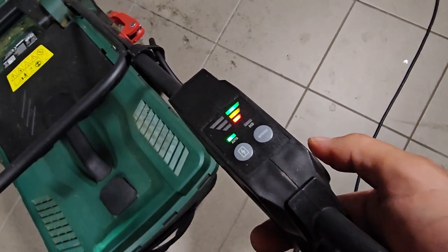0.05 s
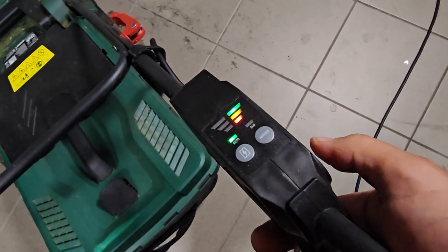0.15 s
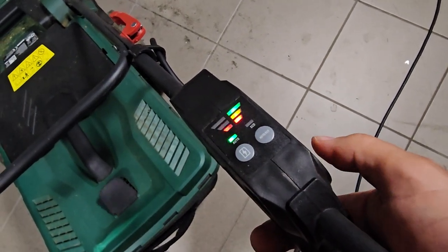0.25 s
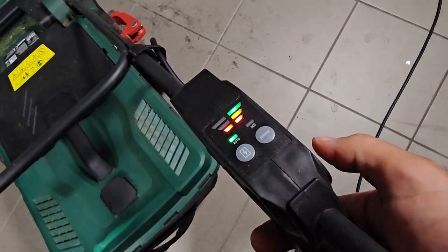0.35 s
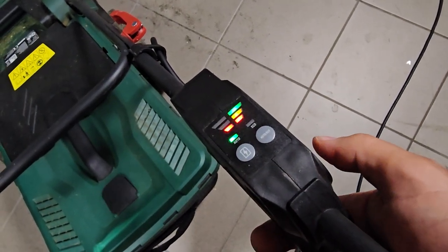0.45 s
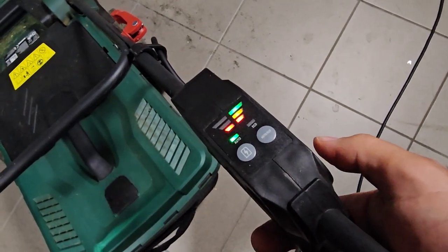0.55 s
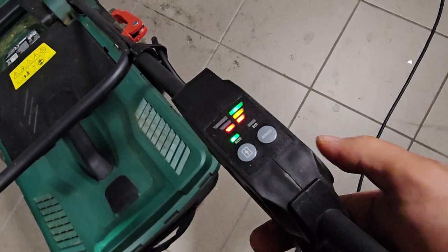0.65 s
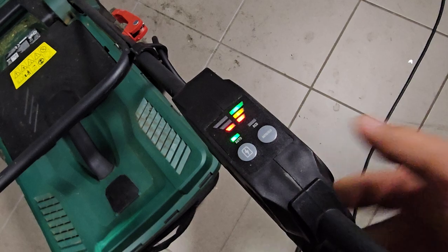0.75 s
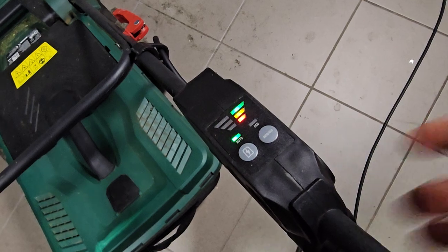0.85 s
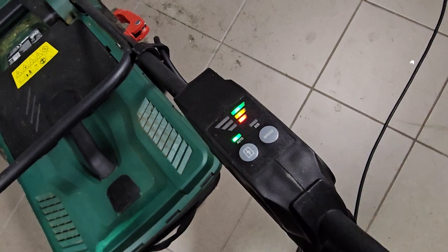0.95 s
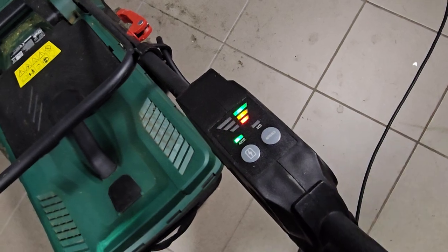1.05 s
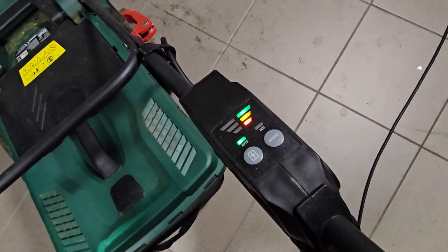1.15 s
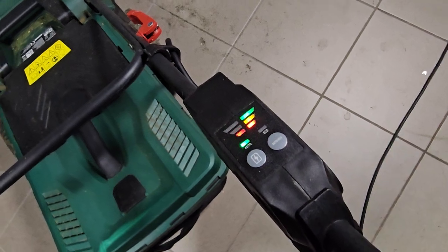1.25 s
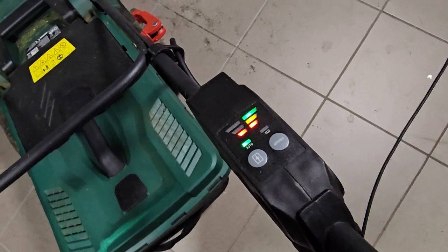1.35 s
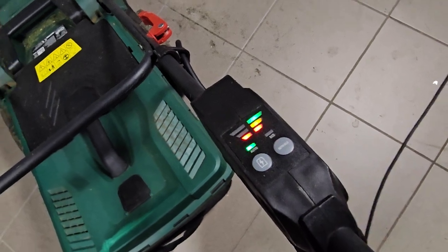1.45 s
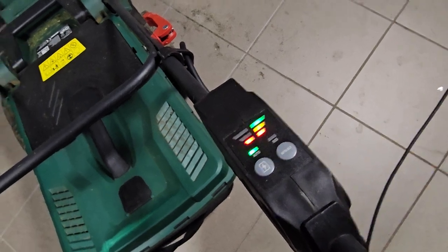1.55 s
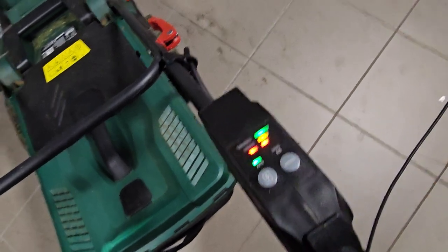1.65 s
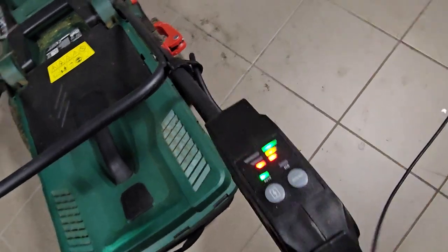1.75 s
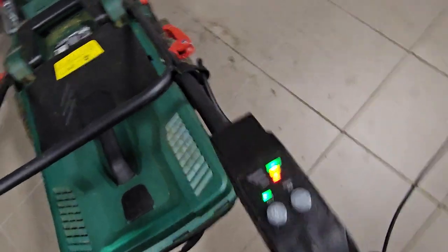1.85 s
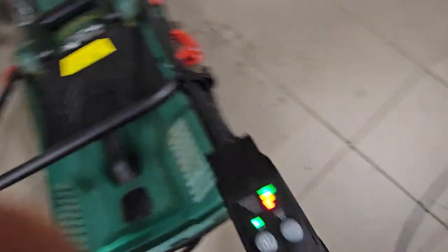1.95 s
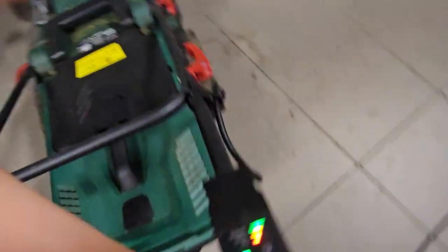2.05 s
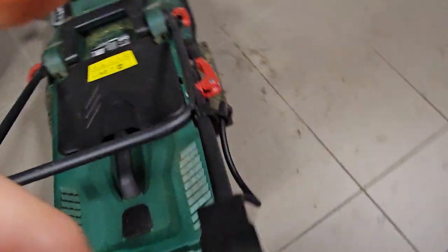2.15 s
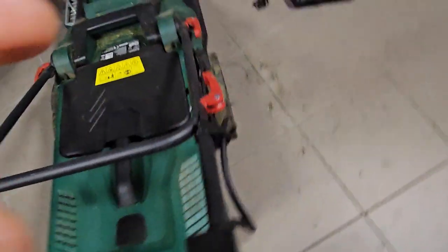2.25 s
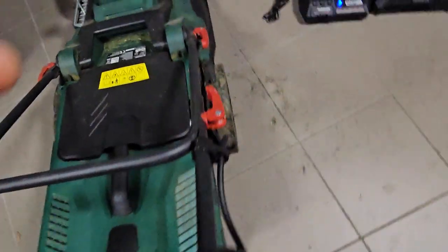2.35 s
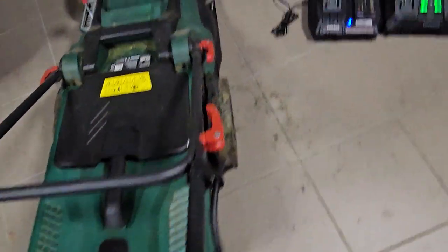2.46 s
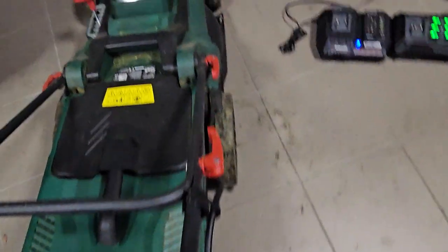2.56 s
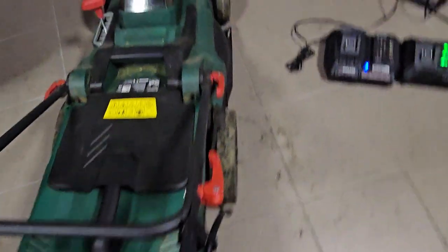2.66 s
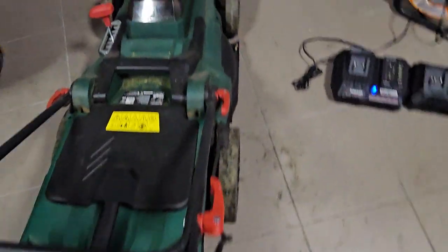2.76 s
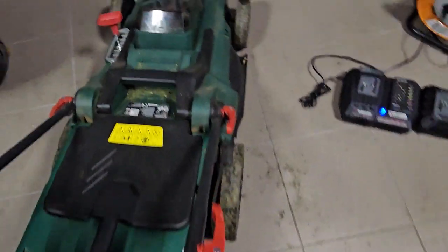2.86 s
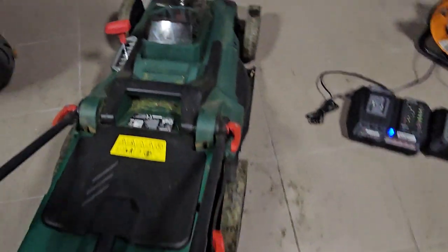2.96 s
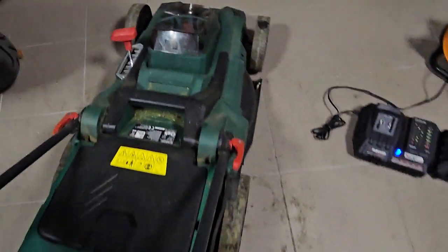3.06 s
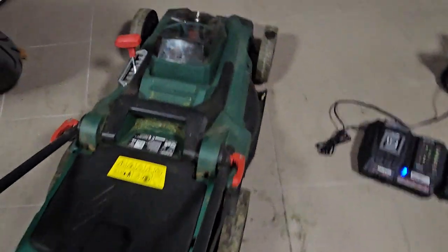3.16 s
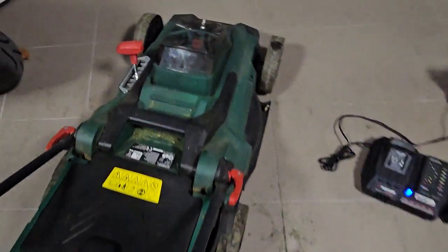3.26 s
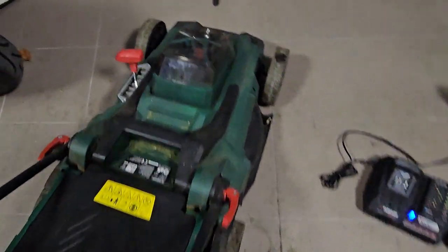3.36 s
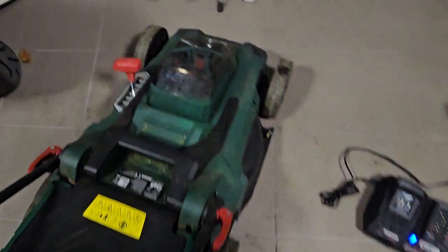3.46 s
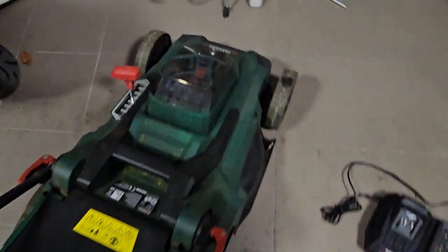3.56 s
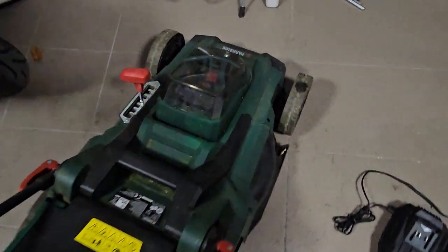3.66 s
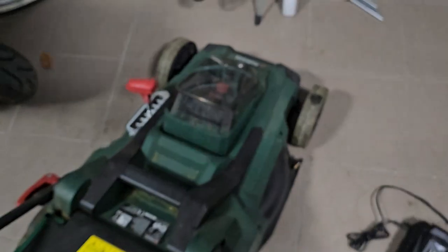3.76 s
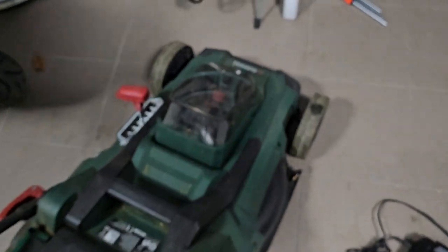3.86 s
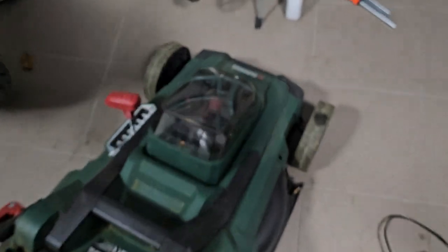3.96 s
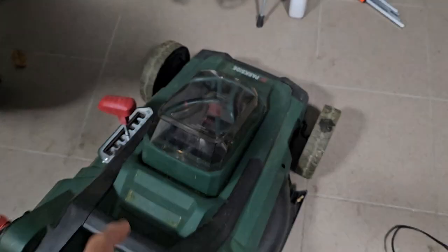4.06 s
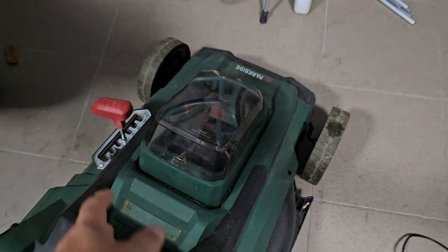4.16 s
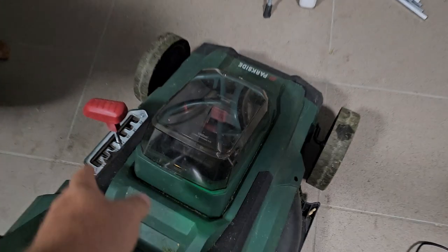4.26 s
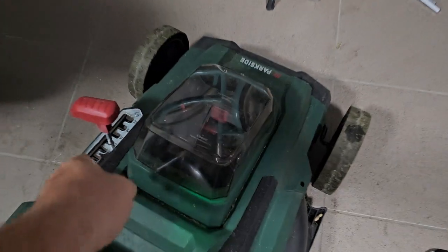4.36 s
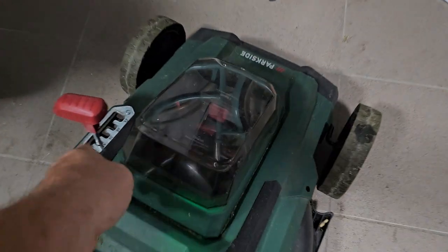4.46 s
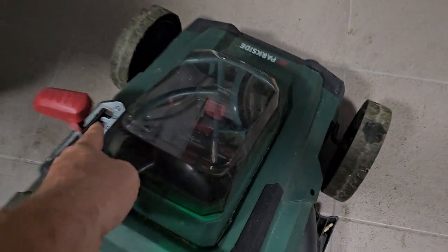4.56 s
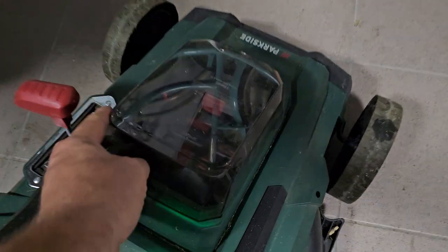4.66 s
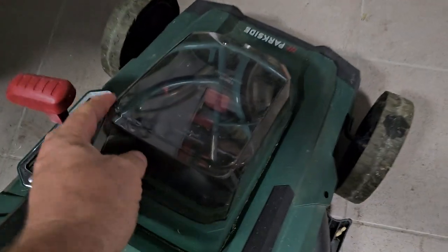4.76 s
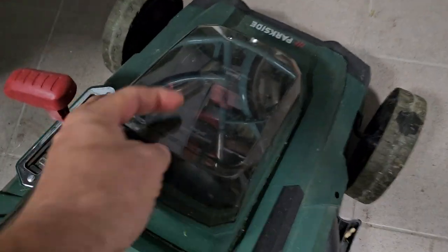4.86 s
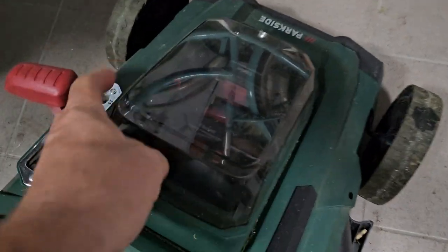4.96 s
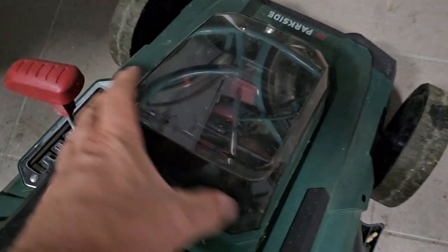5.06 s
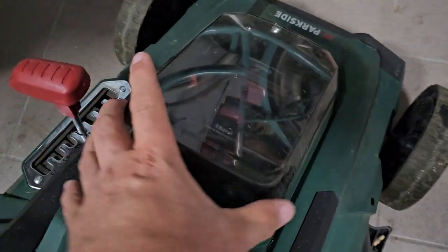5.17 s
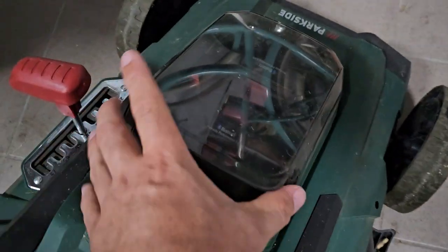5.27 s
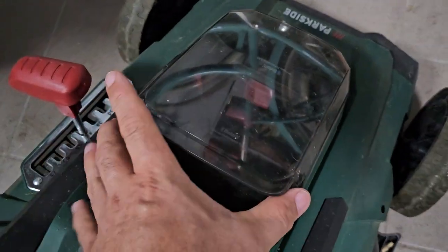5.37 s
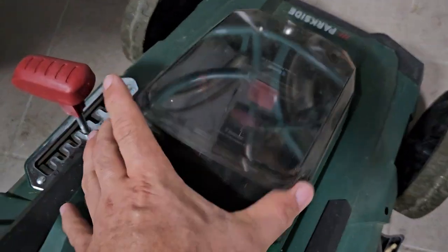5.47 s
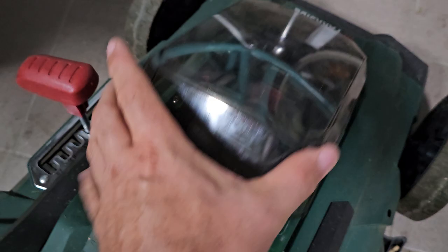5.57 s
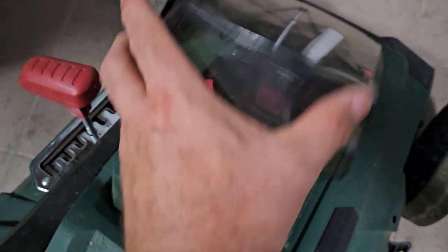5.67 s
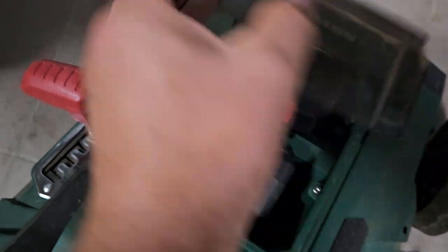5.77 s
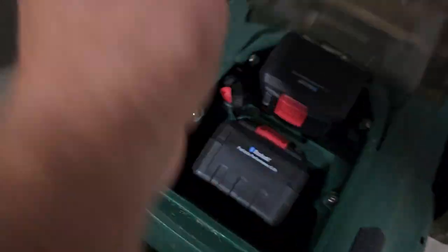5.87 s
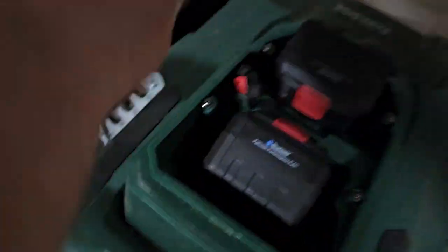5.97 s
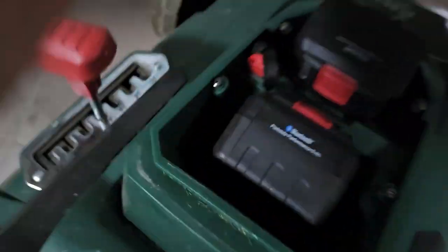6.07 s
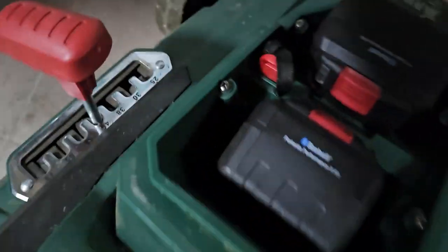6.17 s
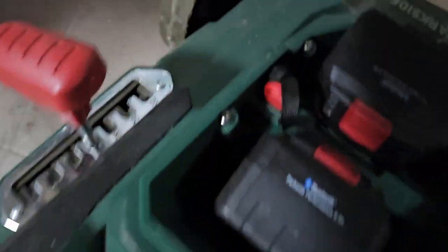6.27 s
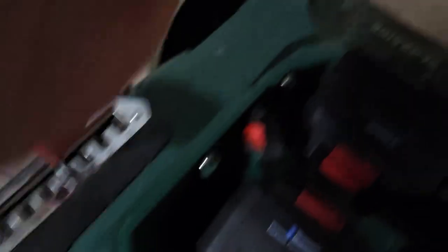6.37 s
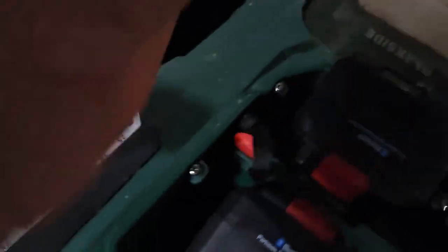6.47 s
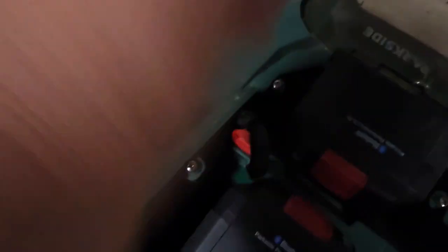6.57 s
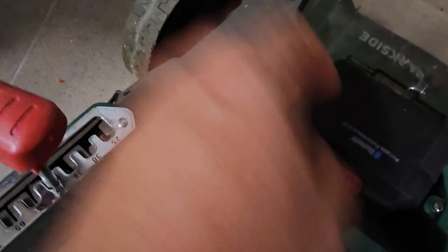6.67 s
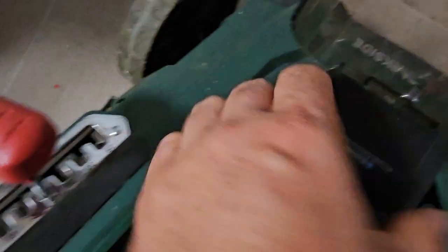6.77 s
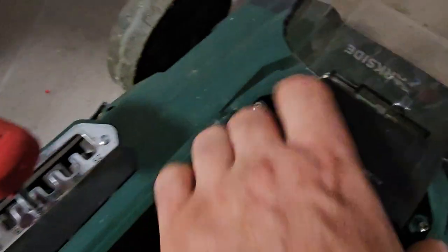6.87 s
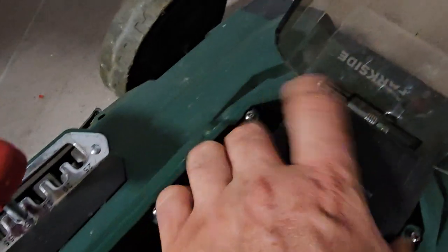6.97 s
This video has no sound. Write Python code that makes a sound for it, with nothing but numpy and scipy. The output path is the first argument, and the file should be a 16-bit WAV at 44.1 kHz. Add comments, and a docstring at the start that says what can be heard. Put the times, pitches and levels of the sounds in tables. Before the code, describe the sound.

Heard close up in a quiet garage, an electric mower hums and whooshes, then winds down with sinking whines and a metallic knock. A spring lever clicks and creaks before slamming back with a brief rattle and ring. Faint cloth swishes and footstep scuffs follow. Near the end a hand bumps and drags over a plastic cover, flips it open with a clatter, and a battery knocks lightly in its slot.

```python
"""A cordless lawnmower runs down in a tiled garage: its spinning blade whirrs through the air, the
motor brakes with falling whines, and the blade rocks to rest with a few knocks.
The switch lever clicks, creaks on its spring and snaps back against the ringing steel handle.
Clothes rustle as someone leans over, lifts the plastic battery lid and grips a battery."""
import sys
import numpy as np
from scipy import signal
from scipy.fft import rfft, irfft, next_fast_len
from scipy.io import wavfile

SR = 44100
rng = np.random.default_rng(int(sys.argv[2]) if len(sys.argv) > 2 else 0)


def inscribe(sig):
    """Save sig as 16-bit PCM at rate SR to the path in sys.argv[1].

    A 1-D sig is mono; a 2-D sig holds one channel per row.
    Samples are clipped to [-1, 1] before scaling.
    """
    pcm = np.round(np.clip(np.atleast_2d(sig).T, -1, 1) * 32767)
    wavfile.write(sys.argv[1], SR, pcm.astype(np.int16))


N = 310023
TIME = np.arange(N) / SR

# Levels in the tables are relative: each function sets the overall loudness of its sound.
# how long the garage echoes: (pitch [Hz], time to fade by 60 dB [s])
ECHO_TIMES = [(100, 0.99), (400, 0.34), (2000, 0.43), (6000, 0.44), (15000, 0.32)]
# how alike left and right are: (pitch [Hz], likeness [1 = the same, 0 = unrelated])
STEREO_LIKENESS = [(80, 0.9), (260, 0.92), (520, 0.88), (1000, 0.16), (2500, -0.062), (12000, -0.0058)]

# the tone colour of the echo and of each noise: (pitch [Hz], level [dB])
ECHO_COLOUR = [(80, -9.5), (300, -6), (1000, 3), (4000, 2.5), (15000, 0.5)]
BACKGROUND_COLOUR = [(12, -34), (20, 4), (55, 2), (167, -14), (255, -6.5), (387, -27.5), (542, -17),
                     (922, -31.5), (1660, -24), (3840, -41.5), (7510, -40.5), (9130, -44), (16000, -33)]
CLOTH_COLOUR = [(180, -2), (300, 2.5), (405, -15), (502, -5.5), (667, -6.5), (1010, -9.5), (1170, -2),
                (1840, 0.5), (4510, -6.5), (7310, -7), (10700, -10), (14900, -9.5), (16000, -14)]
HAND_DRAG_COLOUR = [(41, -14), (70, 0), (87, -13), (118, 1.5), (250, 3), (474, -34), (545, -7.5),
                    (593, -19), (900, -21), (1170, -58), (1980, -120)]
WIRE_CHATTER_COLOUR = [(59, -41.5), (100, -12.5), (177, -16), (308, 4.5), (406, -13), (546, -7),
                       (801, -15.5), (1280, -9), (1700, -7.5), (1950, -1.5), (2800, -15), (4280, -9.5),
                       (5300, -15), (15000, -21.5), (16000, -32)]
BRAKE_RASP_COLOUR = [(500, -43), (1100, -10), (1320, 1), (1700, -14.5), (2150, -8), (2350, 2.5),
                     (2600, -15.5), (3100, -21.5), (8000, -50.5)]
BLADE_AIR_COLOUR = [(59, -28), (100, -17), (119, -6.5), (193, -10.5), (234, 3), (289, -6), (321, 0.5),
                    (397, -13.5), (513, -2.5), (735, -10.5), (784, -13), (2040, -14.5), (3320, -20.5),
                    (4760, -21), (16000, -40.5)]

# things that knock: (time [s], bass [dB], middle [dB], treble [dB], fade time [s])
SMALL_TICKS = [(1.831, -60, -50.5, -54, 0.0022), (1.915, -62, -69, -53.5, 0.0015),
               (1.95, -48.5, -67, -47, 0.0033), (1.972, -56, -44.5, -47, 0.0012),
               (2.023, -48, -49.5, -51, 0.002), (2.246, -63, -48, -73, 0.00044),
               (2.858, -80, -46.5, -101.5, .002), (2.912, -86.5, -44.5, -99, 0.0018),
               (3.345, -91.5, -54.5, -70, 0.0024), (3.367, -97, -60, -54.5, 0.0018),
               (3.526, -56.5, -47, -59, 0.006), (4.053, -68, -51, -69, 0.0045),
               (4.211, -87.5, -41.5, -48, 0.0016)]  # a hand's grip, and grit under shoes
LID_HITS = [(4.779, -46.5, -53.5, -58.5, 0.0064), (4.882, -56, -49.5, -46.5, 0.0075),
            (4.897, -35.5, -68, -69, 0.0028), (4.914, -29, -44, -61, 0.0036), (4.96, -70, -41, -43, 0.0035),
            (5.056, -48, -63, -47.5, 0.0054), (5.125, -44.5, -81, -52, 0.0042),
            (5.558, -36, -48, -52, 0.023), (5.573, -26, -35.5, -42.5, 0.0052),
            (5.586, -26, -26.5, -49, 0.0069), (5.593, -23.5, -41, -55, 0.0028),
            (5.612, -28.5, -49, -58, 0.0029), (5.66, -40, -47.5, -58.5, 0.013),
            (5.772, -56, -49, -62, 0.012), (5.796, -42.5, -53, -57.5, 0.036), (6.07, -49, -47, -48, 0.015)]  # fingers and lid hit the housing
BATTERY_HITS = [(6.422, -48.5, -45, -43.5, 0.0022), (6.467, -50.5, -50.5, -49.5, 0.0084),
                (6.565, -44.5, -53.5, -59, 0.01), (6.594, -50, -35, -44.5, 0.0064),
                (6.604, -49, -55, -45.5, 0.0057), (6.777, -54, -59, -61, 0.0085),
                (6.797, -51.5, -45.5, -59.5, 0.029), (6.83, -48.5, -65, -58, 0.011),
                (6.984, -52.5, -52.5, -50.5, 0.004)]  # the battery shifts in its slot
LEVER_HITS = [(2.1037, -54, -31, -28, .001), (2.1087, -54, -31, -30, .0016),
              (2.4405, -35, -20.5, -22, .0014)]  # the lever unlatches, then slams home
BLADE_HITS = [(.524, -16, -21, -25, 0.0096), (.541, -18.5, -39, -23.5, 0.0025),
              (1.033, -36.5, -39, -39.5, 0.0061), (1.078, -33.5, -42, -55, 0.0015),
              (1.12, -40.5, -47, -57, 0.0018), (1.192, -41, -58, -80, 0.003),
              (1.251, -46, -50.5, -62, 0.0029), (1.367, -52, -88, -90, .003),
              (1.418, -52.5, -56.5, -79, 0.002)]  # the brake jolts the slack drive, then the blade rocks

# the notes a struck part rings with: (pitch [Hz], level [dB], time to fade by 60 dB [s])
LID_NOTES = [(187, -1, 0.099), (259, -1, 0.22), (376, -31, .07), (456.5, 6.5, 0.19), (1095, -3, 0.27),
             (1262, -5, 0.19), (1366, 8.5, .17), (1900, 9, 0.12), (3200, 5, 0.35)]
BATTERY_NOTES = [(208.5, 0.5, 0.16), (330, -13, 0.22), (443, 3, 0.17), (890, 2.5, 0.077), (1340, -11, 0.17),
                 (1517, 7.5, 0.15), (2050, 6.5, 0.058), (3180, 0.5, 0.18), (4350, -9, 0.14)]
SPRING_NOTES = [(3090, -7.5, 0.012), (4570, -1.5, .003), (7700, -1.5, 0.0078), (8300, -21, .004)]
LATCH_NOTES = [(3627, -9.5, 0.01), (4020, 8, 0.0078)]
HANDLE_NOTES = [(280, -13.5, 2.44), (342, -17.5, 0.8), (1920, -15.5, .45), (2300, -13, .2),
                (2740, -28, 0.37), (4662, -7.5, .28), (4926, -19, .2)]
BLADE_NOTES = [(140, -4, 0.24), (252, 9.5, 0.1), (502, 7, 0.12), (539, 8, 0.17), (734.6, 0.5, .07),
               (3600, -7, .3), (3400, -0.5, 0.28), (3795, 0.5, 0.27), (3670, 3, 0.27), (4788, -2, .5)]  # the steel blade and the deck, the plastic shell around it

# strokes of cloth or of a sole: (peak time [s], length [s], scuff level [dB], swish level [dB])
CLOTH_STROKES = [(1.77, 0.34, -57, -55.5), (1.972, 0.24, -50, -68), (2.18, 0.71, -60.5, -53),
                 (2.78, 0.3, -54.5, -58.5), (2.98, 0.22, -61.5, -73), (3.457, 0.31, -73, -65),
                 (3.548, 0.12, -47, -58.5), (3.625, 0.17, -62, -52.5), (4.068, 0.1, -52.5, -50.5),
                 (4.212, 0.31, -48.5, -56), (4.349, 0.12, -50, -41.5), (4.474, 0.15, -45.5, -48),
                 (4.639, 0.14, -56, -55), (4.921, 0.36, -52, -54), (5.098, 0.12, -45, -47.5),
                 (5.433, 1, -66.5, -68.5), (5.921, 0.21, -61, -62), (6.062, 0.3, -56.5, -58.5),
                 (6.214, .2, -63.5, -59.5), (6.826, 0.15, -67, -72), (6.946, .13, -62, -65.5)]
# soft bumps of a palm and its grip: (time [s], level [dB], pitch [Hz], fade time [s])
HAND_THUDS = [(1.604, -53, 60.1, 0.026), (1.666, -45, 64, 0.011), (1.953, -45, 97, 0.024),
              (2.02, -40, 96, 0.0077), (4.455, -46, 109.5, 0.015), (4.698, -44, 150.4, 0.032),
              (4.943, -23, 182, 0.0055), (6.161, -50.5, 48, .04), (6.419, -27, 97.3, 0.0048)]
# the hand drags on the hollow lid: (peak time [s], length [s], level [dB])
HAND_DRAGS = [(4.475, 0.23, -65), (4.919, 0.37, -35.5), (5.144, 0.55, -52), (5.47, 0.89, -52.5)]
# the lever's spring sticks and slips: (time [s], rate [slips per second])
SPRING_SLIPS = [(2.225, 160), (2.244, 147), (2.29, 83), (2.32, 114), (2.359, 220), (2.427, 93)]

# the blade's shaft slows down: (time [s], speed [turns per second])
SHAFT_SPEED = [(0, 91), (.15, 89.8), (.33, 80.2), (.48, 72.8), (.58, 69.5), (.62, 64.5), (.68, 54.4),
               (.76, 40.2), (.83, 30), (.862, 23.7), (.905, 11.4), (.96, 6.26), (1.03, 2.76)]
# tones of the turning parts: (pitch [multiple of the shaft speed], level [dB])
BLADE_TONES = [(1, -24), (2, -38), (3, -31.5), (4, -25.5), (6, -38)]  # out-of-balance shake and the passing blade
MOTOR_TONES = [(2, -41.5), (16, -43), (24, -36), (33, -36.5), (48, -45)]  # slots in the motor
# pitches that the deck makes louder: (pitch [Hz], width [Hz], level [dB])
DECK_RESONANCES = [(134, 12, 13.5), (244.3, 24, 20.5), (558, 63, 22.5), (683, 51, 16), (1096, 39, 11),
                   (1310, 130, 11), (2350, 300, 15.5)]
# the brake briefly bites harder: (peak time [s], length [s], added pull [dB])
BRAKE_BITES = [(0.562, 0.23, 5), (0.861, 0.075, 8.5), (0.914, .05, -1)]


def amp(db):
    """Turns decibels into a gain to multiply by."""
    return 10 ** (np.asarray(db) / 20)


def unit_level(x):
    """Scales a signal to an average (rms) level of 1."""
    return x / np.sqrt(np.mean(x ** 2) + 1e-20)


def look_up(table, hz):
    """Reads a table at any pitch, sliding between its rows."""
    pitches, values = np.transpose(table)
    return np.interp(np.log(hz + 1), np.log(pitches + 1), values)


def add(mix, start, sound):
    """Mixes a sound in at a start time in seconds."""
    part = mix[:, round(start * SR):][:, :sound.shape[1]]
    part += sound[:, :part.shape[1]]


def ramp(start, length):
    """Rises from 0 to 1 over the given time."""
    return np.clip((TIME - start) / length, 0, 1)


def stroke(peak, length):
    """Gain of one stroke or pull: it swells, peaks and fades a little more slowly."""
    rise_share, depth_db, roundness = 0.41, 26.5, 1.17
    away = np.maximum((peak - TIME) / rise_share, (TIME - peak) / (1 - rise_share)) / length
    return amp(-depth_db * np.minimum(away, 10) ** roundness)


def waver(rate_hz, count=N):
    """A smooth random wobble around zero."""
    points = rng.standard_normal(count // 16)
    return unit_level(np.interp(TIME[:count] * rate_hz, np.arange(len(points)), points))


def below(hz, edge_hz):
    """Gain that keeps pitches below the edge; swap the arguments to keep those above it."""
    return 1 / np.sqrt(1 + ((hz + 1) / (edge_hz + 1)) ** 6)


def stereo(x, colour=lambda hz: 1):
    """Colours two unrelated signals and makes them alike in the bass, like sound in a room."""
    size = next_fast_len(x.shape[1])
    hz = np.fft.rfftfreq(size, 1 / SR)
    first, second = rfft(x, size)
    likeness = look_up(STEREO_LIKENESS, hz)
    mid = first * np.sqrt((1 + likeness) / 2)
    side = second * np.sqrt((1 - likeness) / 2)
    return irfft(np.array([mid + side, mid - side]) * colour(hz), size)[:, :x.shape[1]]


def noise(colour, shape=lambda hz: 1):
    """Steady stereo noise with the given tone colour."""
    white = rng.standard_normal((2, N))
    return unit_level(stereo(white, lambda hz: amp(look_up(colour, hz)) * shape(hz)))


def click(colour, size=2048):
    """A click with the given tone colour and no sound ahead of its start."""
    log_gain = np.log(amp(look_up(colour, abs(np.fft.fftfreq(size, 1 / SR)))))
    return np.fft.ifft(np.exp(np.conj(signal.hilbert(log_gain)))).real


def knocks(hits, gain_db, sub_db, hard_db, top_db, grit, size=4096):
    """Each knock is a push plus a gritty scrape, coloured by how hard and hollow the spot is."""
    out, t = np.zeros((2, N)), np.arange(size) / SR
    push = np.exp(-t / 0.00009)
    for start, bass_db, middle_db, treble_db, fade in hits:
        scrape = stereo(rng.standard_normal((2, size))) * np.exp(-t / fade) * (1 - np.exp(-5 * t / fade))
        force = np.sqrt(grit) * scrape / np.linalg.norm(scrape[0]) + np.sqrt(1 - grit) * push / push.sum()
        colour = [(50, bass_db + sub_db), (170, bass_db), (480, bass_db - 2),
                  (1150, middle_db - 6 - hard_db), (2200, middle_db - 9 + hard_db),
                  (4200, treble_db - 8), (15000, treble_db + top_db)]
        add(out, start, signal.fftconvolve(force, click(colour)[None], axes=1))
    return amp(gain_db) * out


def ring(x, notes, gain_db):
    """A part shaken by x rings with its own fading notes."""
    t = np.arange(SR) / SR
    response = sum(amp(db - 60 * t / fade) * np.sin(2 * np.pi * hz * t) / np.sqrt(fade)
                   for hz, db, fade in notes)
    return amp(gain_db) * signal.fftconvolve(x, response[None], axes=1)[:, :N]


def garage(x, echo_db):
    """Adds scattered echoes from the walls; the bass lasts longest."""
    t = np.arange(SR * 3 // 4) / SR
    bounces = rng.standard_normal((2, len(t))) * (rng.random((2, len(t))) < .12) * (t > .005)
    hz, age, bands = signal.stft(bounces, SR, nperseg=256)
    fade = amp(-60 * age / look_up(ECHO_TIMES, hz)[:, None])
    echo = signal.istft(bands * fade, SR, nperseg=256)[1]
    echo = stereo(echo / np.linalg.norm(echo[0]), lambda hz: amp(look_up(ECHO_COLOUR, hz)))
    return x + amp(echo_db) * signal.fftconvolve(x, echo, axes=1)[:, :N]


def background():
    """A faint, steady rumble and hiss."""
    return amp(-63.5) * noise(BACKGROUND_COLOUR)


def clothes_and_shoes():
    """Cloth swishes and soles scuff in clumps of fine grains, with a few separate ticks."""
    stir = ramp(1.96, .05) * amp(-2.5 * waver(15))  # the clothes never quite rest between strokes
    scuff_gain, swish_gain = amp(-78) * stir, amp(-80) * stir
    for peak, length, scuff_db, swish_db in CLOTH_STROKES:
        swell = stroke(peak, length)
        scuff_gain += amp(scuff_db) * swell
        swish_gain += amp(swish_db) * swell
    scuff = amp(-1.5) * scuff_gain * noise(CLOTH_COLOUR, lambda hz: below(hz, 4170))
    swish = amp(1.5) * swish_gain * noise(CLOTH_COLOUR, lambda hz: below(4730, hz))
    clumps = amp(1.8 * waver(70))
    ticks = knocks(SMALL_TICKS, gain_db=42, sub_db=4, hard_db=-1.5, top_db=-24, grit=0.82)
    grains = scuff * amp(3 * waver(600)) + swish * amp(2.2 * waver(1100))
    return garage(grains * clumps + ticks, echo_db=-8) * amp([[-.8], [.8]])  # a little to the right


def hand_thuds():
    """Soft pushes of the hand make low tones that die within a few swings."""
    out, t = np.zeros((2, N)), np.arange(SR // 4) / SR
    onset = 1 - np.exp(-t / 0.0019)
    for start, db, hz, fade in HAND_THUDS:
        thud = amp(db) * np.sin(2 * np.pi * hz * t) * np.exp(-t / fade) * onset
        add(out, start, thud[None])
    return amp(3.5) * out


def lid_and_battery():
    """The hand drags on the lid, flips it open against its stop and takes hold of the battery."""
    lid = knocks(LID_HITS, gain_db=41.5, sub_db=-17, hard_db=-1, top_db=-18, grit=0.88)
    battery = knocks(BATTERY_HITS, gain_db=40.5, sub_db=0.5, hard_db=-1.5, top_db=-28, grit=0.97)
    battery *= amp([[-.7], [.7]])  # a little to the right
    pressure = sum(amp(db) * stroke(peak, length) for peak, length, db in HAND_DRAGS)
    drag = pressure * noise(HAND_DRAG_COLOUR) * amp(waver(45) - 2.5)
    ringing = ring(lid, LID_NOTES, gain_db=-61.5) + ring(battery, BATTERY_NOTES, gain_db=-53.5)
    return garage(lid + battery + ringing, echo_db=-13) + drag


def spring_creak():
    """The spring sticks and slips; each slip rings it, and faster slips are weaker."""
    times, rates = np.transpose(SPRING_SLIPS)
    rate = np.interp(TIME, times, rates) * amp(0.8 * waver(150))
    slip_count = np.floor(np.cumsum(rate) / SR)
    moving = (TIME > times[0]) & (TIME < times[-1])
    slips = np.diff(slip_count, prepend=0) * moving * (rates.min() / rate) ** 1.63
    return ring(np.array([slips, slips]), SPRING_NOTES, gain_db=-58)


def wire_chatter():
    """The lever's wire bar rattles on the handle for a moment, then dies away."""
    start_s, hold_s, fade_db_per_s = 2.433, 0.045, 253
    level_db = -27 - fade_db_per_s * np.maximum(TIME - start_s - hold_s, 0)
    return ramp(start_s, 0.0094) * noise(WIRE_CHATTER_COLOUR) * amp(level_db + 2 * waver(500))


def switch_lever():
    """The lever unlatches, creaks and slams home, which sets the steel handle ringing."""
    snaps = knocks(LEVER_HITS, gain_db=41, sub_db=-16, hard_db=5.5, top_db=-16, grit=0.69)
    latch = snaps + ring(snaps, LATCH_NOTES, gain_db=-57.5)
    chatter = wire_chatter()
    handle = ring(latch + chatter, HANDLE_NOTES, gain_db=-60.5)
    return garage(latch, echo_db=-10) + garage(chatter + spring_creak() + handle, echo_db=-4.5)


def rocking_blade():
    """Knocks in the drive ring the deck and the steel blade."""
    hits = knocks(BLADE_HITS, gain_db=40, sub_db=-29.5, hard_db=-3.5, top_db=-41.5, grit=0.55)
    return garage(hits + ring(hits, BLADE_NOTES, gain_db=-53), echo_db=-5)


def deck_gain(hz, strength):
    """The deck boosts any pitch that lies near one of its resonances."""
    return 1 + strength * sum(amp(db) / (1 + ((hz - centre) / (width / 2)) ** 2)
                              for centre, width, db in DECK_RESONANCES)


def through_deck(x):
    """A sliding tone sets each deck resonance ringing as it passes."""
    t = np.arange(SR // 3) / SR
    response = sum(amp(db) * 2 * np.pi * width / SR * np.exp(-np.pi * width * t)
                   * np.cos(2 * np.pi * hz * t) for hz, width, db in DECK_RESONANCES)
    return amp(-6.5) * x + signal.oaconvolve(x, response[None], axes=1)[:, :N]


def shaft_tone(multiple, speed, rough):
    """A tone that follows the shaft until it stops; the higher it is, the more it blurs into noise."""
    hz = multiple * speed[TIME < SHAFT_SPEED[-1][0]]
    blur = np.clip(rough * hz / 1000, 0, .85)
    turn = np.exp(2j * np.pi * np.cumsum(hz) / SR)
    flutter = np.array([waver(130, len(hz)) + 1j * waver(130, len(hz)) for side in range(2)])
    tone = np.sqrt(2 * (1 - blur)) * turn.real + np.sqrt(blur) * stereo((flutter * turn).real)
    return np.pad(tone, ((0, 0), (0, N - len(hz))))


def motor_whine(speed, pull):
    """The motor's slots whine through the deck, louder as the brake pulls harder."""
    slots = sum(amp(db) * below(k * speed, 2600) * below(135, k * speed) * shaft_tone(k, speed, rough=.35)
                for k, db in MOTOR_TONES)
    return through_deck(pull * slots)


def motor_groan(speed):
    """The motor's magnetic pull, four times a turn, grabs the deck, sags and lets go."""
    start_s, end_s, edge_s, sag_db_per_s = .593, .702, 0.014, 65.5
    grab = ramp(start_s, edge_s) * (1 - ramp(end_s - edge_s, edge_s))
    level_db = -10.5 - sag_db_per_s * np.maximum(TIME - start_s, 0)
    return grab * amp(level_db) * shaft_tone(4, speed, rough=.04)


def blade_hum(speed, pace):
    """The slightly unbalanced blade hums, fading fast as it slows."""
    return pace ** 4.2 * sum(
        amp(db) * deck_gain(k * speed, strength=0.096) * shaft_tone(k, speed, rough=0.49 * (k - 1))
        for k, db in BLADE_TONES)


def blade_air(pace):
    """Churned air roars and the blade tips hiss; the hiss fades first."""
    roar = noise(BLADE_AIR_COLOUR, lambda hz: below(hz, 3000) * deck_gain(hz, strength=0.012))
    hiss = noise(BLADE_AIR_COLOUR, lambda hz: below(3000, hz))
    return amp(-19) * pace ** 0.92 * roar + amp(-31) * pace ** 1.68 * hiss


def mower():
    """The blade runs down while the electric brake comes on, whining and rasping in the motor."""
    speed = np.interp(TIME, *np.transpose(SHAFT_SPEED))
    pace = speed / speed[0]  # 1 at full speed
    turning = 1 - ramp(SHAFT_SPEED[-1][0] - .03, 0.032)
    brake = amp(-15 + 10 * ramp(start=0.29, length=0.61))
    bite = 1 + sum(amp(db) * stroke(peak, length) for peak, length, db in BRAKE_BITES)
    hum = blade_hum(speed, pace)
    motor = motor_whine(speed, pull=turning * brake * bite) + motor_groan(speed)
    air = blade_air(pace)
    rasp = amp(-28) * brake * bite ** .6 * pace ** 0.63 * noise(BRAKE_RASP_COLOUR)
    chop = 1 + 0.17 * np.cos(4 * np.pi * np.cumsum(speed) / SR)  # two tips pass the chute each turn
    whirr = turning * (hum + chop * (air + rasp))
    return garage(whirr + motor, echo_db=-9) * amp([[.8], [-.8]])  # a little to the left


def scene():
    """Everything in the quiet garage."""
    machine = mower() + rocking_blade() + switch_lever()
    person = lid_and_battery() + hand_thuds() + clothes_and_shoes()
    return machine + person + background()


def record(dry):
    """Cuts away the very highest treble."""
    low_pass = signal.firwin(511, cutoff=16050, window=("kaiser", 9), fs=SR)
    return signal.oaconvolve(dry, low_pass[None], "same")


dry = scene()
out = record(dry)
inscribe(out)
```